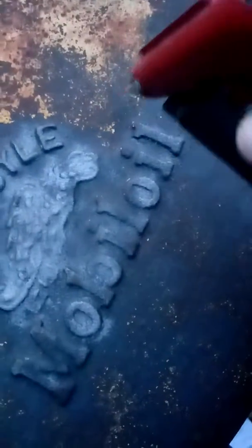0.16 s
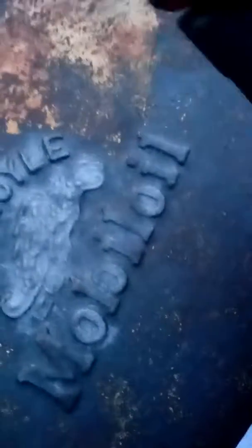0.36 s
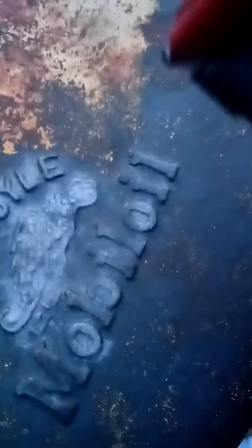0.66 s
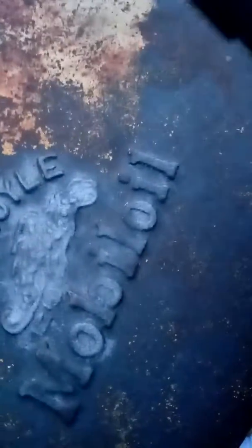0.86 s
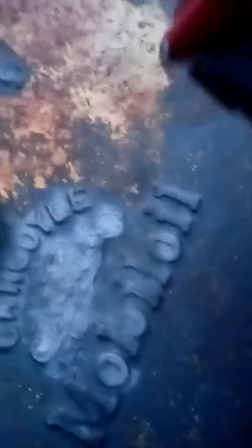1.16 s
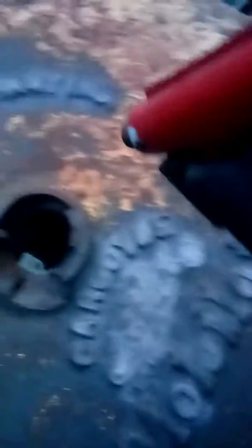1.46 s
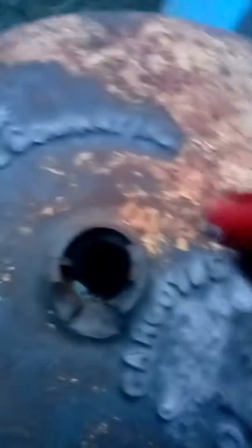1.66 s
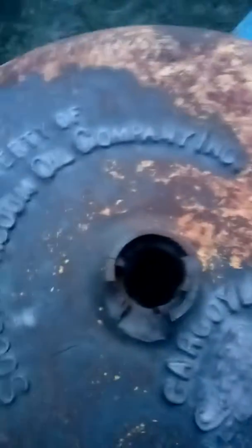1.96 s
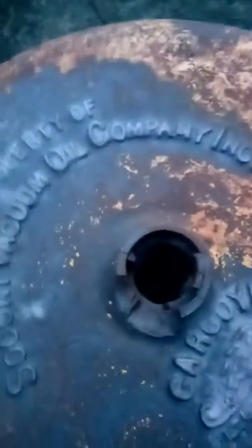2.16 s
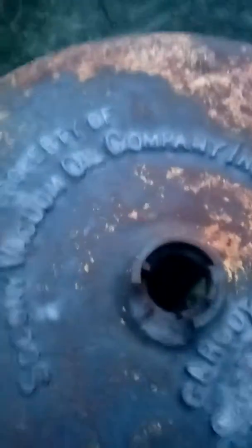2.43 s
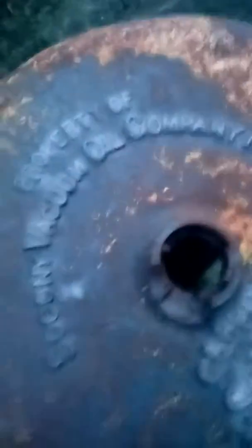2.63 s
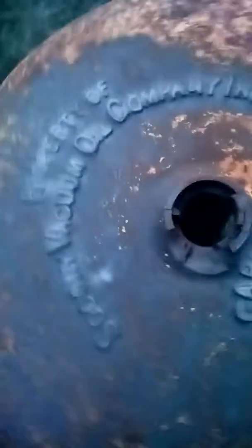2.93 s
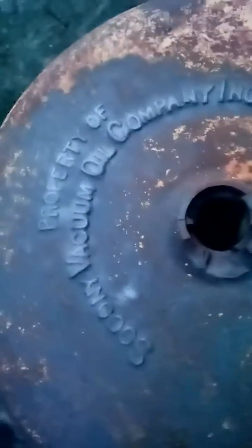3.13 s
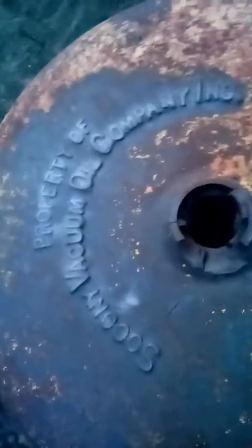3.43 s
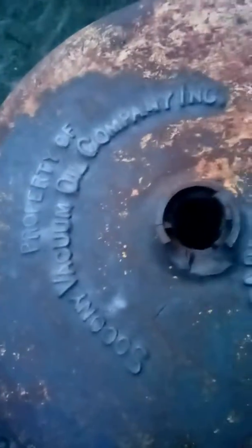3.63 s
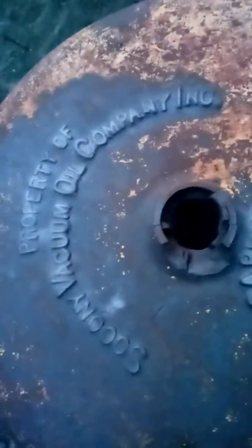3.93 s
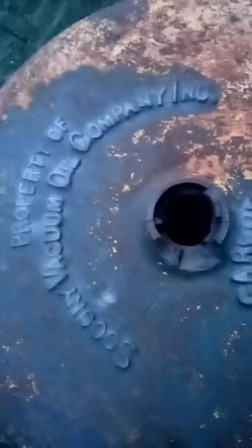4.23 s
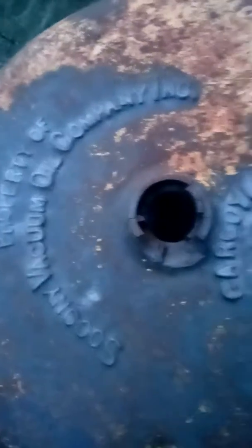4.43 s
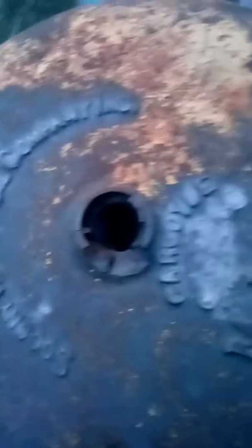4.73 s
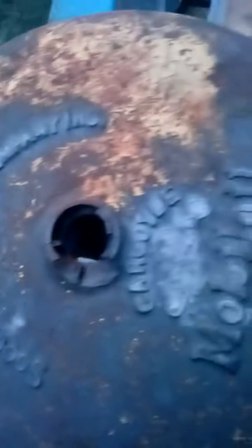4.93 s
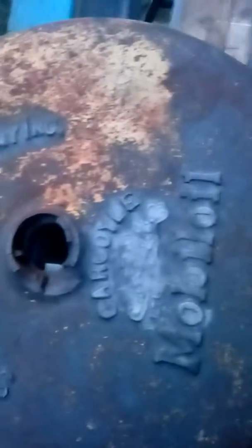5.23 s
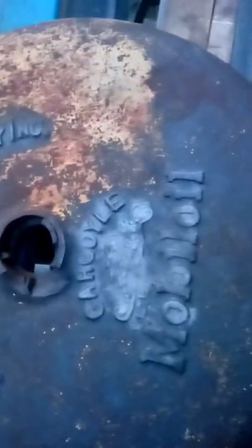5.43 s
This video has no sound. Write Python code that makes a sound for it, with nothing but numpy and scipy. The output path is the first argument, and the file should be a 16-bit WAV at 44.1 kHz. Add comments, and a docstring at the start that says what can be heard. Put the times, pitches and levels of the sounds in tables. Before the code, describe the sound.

At a workshop bench, a loud, slightly whistling jet of air and sand strikes rusty iron, turns briefly hollow and stops abruptly. A thin hiss trails away while a compressor hums low in the background with a faint, breathy tone. Then the heavy iron base slides round on loose sand, quieter than the blast, making a low rumble and many sharp, irregular crunches with a slight metallic ring. The sound is mono.

```python
"""At a blasting bench, a gun's turbulent jet of air and sand hisses against a cast-iron base, booms across its
centre hole and shuts off. Residual air bleeds from the nozzle and fades, and a hollow, breathy tone sets in. A
piston compressor drones behind at multiples of its crank rate; the drone sits lower in level until the jet
shuts off. The base is then dragged round on the spent grit: friction makes a low rumble and a rustle, and the
grit crunches in short, ringing bursts."""
import sys
import numpy as np
from scipy import signal
from scipy.io import wavfile

SR = 44100
rng = np.random.default_rng(int(sys.argv[2]) if len(sys.argv) > 2 else 0)


def output_pcm(signal):
    """Save a mono or channel-first signal as 16-bit PCM at the path in sys.argv[1].

    Samples are clipped to [-1, 1] before scaling.
    """
    pcm = np.clip(np.atleast_2d(signal).T, -1, 1) * 32767
    wavfile.write(sys.argv[1], SR, np.round(pcm).astype(np.int16))


N = 246078

# The jet. Each row: time in seconds, level in dB, centre of the whistling band in Hz, its lift in dB.
JET = [(0, -16.5, 3270, 5.5), (.2, -18, 3520, 2), (.38, -18, 3570, -4.5), (.52, -18.5, 4030, 2),
       (.6, -18.5, 5300, 10), (.72, -17.5, 4750, 1), (.8, -19, 4300, 6.5), (.92, -18, 4640, -1.5),
       (1.15, -18.5, 4150, 4.5), (1.3, -19.5, 4850, 1.5), (1.47, -16.5, 4410, 10), (1.58, -14.5, 4740, 4),
       (1.735, -15.5, 4900, 3.5)]
# Spectrum of the jet. Each row: frequency in Hz, relative level in dB.
JET_SPECTRUM = [(120, -54), (200, -17), (227, -27.5), (507, -22), (718, -9), (786, -14), (1130, -8.5),
                (2530, -7.5), (3510, 0), (5160, -3.5), (6540, -12.5), (9950, -11), (12600, -26.5),
                (15700, -15)]
# The midrange thins as the jet leaves the flat iron. Each row: time in seconds, lift in dB.
JET_MIDRANGE = [(0, 2), (1.2, 0.5), (1.36, -4), (1.56, -11.5), (1.735, -9)]
# Treble of the jet. Each row: time in seconds, lift in dB before weighting by frequency.
JET_TREBLE = [(0, -3), (.5, 1.5), (.9, -7), (1.15, 1.5), (1.3, -3), (1.52, 2.5), (1.735, -11)]
# Resonances of the base. Each row: centre in Hz, width in Hz, lift in dB at full strength.
IRON_MODES = [(2116, 350, 7.5), (2535, 150, 4.5), (2960, 99, 3), (3670, 91, 3), (4420, 300, 1),
              (4780, 1050, 2)]
# Echo off the iron. Each row: time in seconds, mean peak spacing in Hz, full ripple amplitude in dB.
IRON_ECHO = [(0, 2300, 2), (1.0, 2450, 2), (1.73, 2400, 3.5), (2.0, 2720, -0.5), (3.2, 2880, 10.5)]
# Air blown across the centre hole. Each row: time in seconds, level in dB.
HOLE_LEVEL = [(1.25, -70), (1.3, -47), (1.53, -33), (1.58, -32.5), (1.704, -27.5), (1.735, -34)]
# Spectrum of the hole. Each row: frequency in Hz, relative level in dB.
HOLE_SPECTRUM = [(88, -50), (150, -22.5), (563, -4.5), (614, -0.5), (658, -3.5), (1020, -9), (1200, -28),
                 (1560, -38), (2640, -120)]

# The compressor's drone. Each row: time in seconds, overall gain in dB.
COMPRESSOR_GAIN = [(0, -52), (.7, -45), (1.35, -48.5), (1.74, -44.5), (1.8, -34), (3.1, -37), (3.3, -34),
                   (4.85, -38), (5.05, -33), (5.58, -34)]
# Harmonics of the crank. Each row: multiple of the crank rate, relative level in dB.
CRANK_ORDERS = [(5, -26), (6, -24), (7, -3.5), (8, 3), (10, -4), (11, -9), (12, -9), (14, -4), (16, -28),
                (18, -10.5), (20, -16.5), (30, -13.5), (44, -13), (70, -14), (88, -11)]
# Noise of the compressor casing. Each row: frequency in Hz, relative level in dB.
CASING_SPECTRUM = [(18, -51), (30, -18), (81, -5.5), (287, -19), (333, -19.5), (372, -19.5), (491, -16.5),
                   (579, -17.5), (751, -14.5), (1260, -18), (1550, -44), (2040, -20), (2500, -39),
                   (3250, -82), (5500, -120)]
# Steady background hiss. Each row: frequency in Hz, relative level in dB.
ROOM_SPECTRUM = [(2000, -83), (8000, -66), (12000, -84), (15700, -73)]

# Air bleeding from the nozzle. Each row: time in seconds, level in dB.
BLEED_LEVEL = [(1.74, -38), (1.79, -32.5), (1.97, -29.5), (2.12, -34), (2.5, -35.5), (2.85, -41),
               (3.15, -52.5)]
# Spectrum of that air. Each row: frequency in Hz, relative level in dB.
BLEED_SPECTRUM = [(1350, -52), (2300, -12), (2510, -12), (3170, 0.5), (4040, 1.5), (4670, 4.5),
                  (5660, -2.5), (6430, -9.5), (8250, -8), (8950, -11.5), (10300, -10), (12300, -23.5),
                  (13100, -34), (15100, -16), (15700, -11.5)]
# Its rising bright band. Each row: time in seconds, centre in Hz.
BLEED_GLIDE = [(2.0, 5020), (2.36, 6000)]
# Its fading treble. Each row: time in seconds, lift in dB before weighting by frequency.
BLEED_TREBLE = [(1.8, 9.5), (3.1, -4.5)]
# Its hiss above 12 kHz. Each row: time in seconds, lift in dB.
BLEED_TOP = [(1.8, -2), (2.06, 3), (2.5, 6), (3.1, -16)]

# The hollow tone. Each row: time in seconds, level in dB.
HOLLOW_LEVEL = [(1.75, -45), (1.8, -36.5), (2.2, -43), (2.5, -47.5), (2.58, -40.5), (2.85, -33.5),
                (3.27, -48), (3.55, -46), (4.78, -34), (5.05, -40), (5.2, -37), (5.36, -45), (5.46, -39),
                (5.58, -37.5)]
# Its lower resonance. Each row: time in seconds, centre in Hz.
HOLLOW_PITCH = [(3.05, 1530), (3.3, 1416)]
# Its upper resonance. Each row: time in seconds, level in dB relative to the lower.
HOLLOW_UPPER = [(1.8, 1.5), (4.78, -8.5), (5.0, -22)]

# The pull on the base. Each row: time in seconds, rumble level in dB, rustle level in dB.
DRAG_LEVELS = [(2.55, -51, -62), (2.68, -40.5, -43), (3.1, -36, -40), (3.5, -35.5, -39.5),
               (3.8, -33, -34.5), (4.1, -31, -36.5), (4.26, -31.5, -32.5), (4.29, -36, -35.5),
               (4.33, -30, -37.5), (4.45, -30.5, -30), (4.62, -29, -31), (4.88, -30, -36),
               (5.01, -45, -41.5), (5.33, -48, -40.5), (5.37, -37, -40), (5.42, -47, -38), (5.5, -44, -41),
               (5.58, -37, -41)]
# Rumble of the sliding iron. Each row: frequency in Hz, relative level in dB.
RUMBLE_SPECTRUM = [(24, -34), (40, -20), (81, 4), (145, -6), (189, -6.5), (311, -10), (411, -8),
                   (453, -14.5), (573, -7), (767, -4), (1040, -15.5), (1100, -13.5), (1430, -17),
                   (2420, -120)]
# Sand under the iron. Each row: frequency in Hz, relative level in dB.
GRIT_SPECTRUM = [(1000, -36), (1700, -11.5), (2030, -7.5), (2710, -3.5), (4560, 0.5), (6020, -13),
                 (8500, -19.5), (9410, -26.5), (10100, -23.5), (11300, -31.5), (12400, -55), (15700, -48)]
# Crunches. Each row: start in seconds, level in dB, ringing frequency in Hz, then treble and
# loose sand, both in dB relative to that level.
CRUNCHES = [(2.7516, -25.5, 4820, -25, -27), (2.9501, -15.5, 3480, -19.5, -24),
            (3.0704, -28.5, 4500, -25, -10), (3.0844, -26, 2500, -25, -14), (3.1337, -19, 4340, -36, -30),
            (3.18, -18, 2500, -28, -18), (3.1934, -19.5, 4430, -22, -25), (3.2216, -21, 2170, -28, -15),
            (3.3528, -16.5, 4450, -30, -16), (3.3944, -30, 2140, -20, -10), (3.5124, -27.5, 4480, -27, -9),
            (3.527, -24, 4490, -30, -10), (3.553, -18.5, 4870, -30, -22), (3.5616, -20, 3550, -21, -19),
            (3.722, -22, 4470, -25, -23), (3.7424, -29, 3600, -25, -18), (3.7884, -20, 4950, -22, -31),
            (3.8274, -12.5, 4370, -29, -15), (3.845, -33, 4970, -23, -31), (3.8716, -26, 4410, -16, -26),
            (3.914, -21.5, 5000, -23, -7), (3.971, -17.5, 4130, -20, -10), (4.0326, -17.5, 2020, -30, -14),
            (4.0528, -15.5, 4380, -27, -16), (4.0904, -18.5, 4420, -29, -10.5),
            (4.1545, -19, 4800, -29, -14), (4.2047, -19, 4300, -28, -11), (4.2234, -25, 3730, -23, -14),
            (4.242, -19, 4440, -23, -15), (4.305, -17.5, 3670, -28, -6), (4.3295, -19, 4800, -30, -22),
            (4.375, -18, 4430, -33, -20), (4.4163, -21, 4400, -29, -14), (4.4475, -21, 4030, -30, -19),
            (4.4657, -25, 3190, -30, -14), (4.5116, -23, 4020, -32, -23), (4.6265, -20, 4040, -32, -24),
            (4.7261, -22, 2480, -29, -24), (4.8219, -27, 4300, -16, -22), (5.155, -27.5, 3810, -39, -5),
            (5.3562, -31, 4770, -23, -4), (5.391, -27.5, 4330, -11, -17), (5.44, -19, 3880, -41, -13.5),
            (5.5238, -23.5, 4310, -35, -9), (5.5414, -19, 4120, -37, -16)]

WINDOW, HOP = 512, 128   # samples per short spectrum and between frames


def from_db(db):
    """Amplitude grows tenfold for every 20 dB."""
    return 10 ** (np.asarray(db) / 20)


def unit_rms(x):
    """Division by the rms gives a signal unit power."""
    return x / np.sqrt(np.mean(x ** 2) + 1e-20)


def column(rows, k, s):
    """Linear interpolation gives column k of a table at times s."""
    return np.interp(s, np.array(rows)[:, 0], np.array(rows)[:, k])


def envelopes(rows, fade_s=0.003):
    """A gate spans the first row to the last; the interpolated columns follow it."""
    s, *columns = np.transpose(rows)
    t = np.arange(N) / SR
    gate = np.clip((t - s[0]) / fade_s + 1, 0, 1) * np.clip((s[-1] - t) / fade_s + 1, 0, 1)
    return [gate] + [np.interp(t, s, c) for c in columns]


def spectrum_db(points, hz):
    """A spectrum is interpolated on a logarithmic frequency axis."""
    return np.interp(np.log(hz), np.log(np.array(points)[:, 0]), np.array(points)[:, 1])


def bell(hz, centre_hz, width_hz):
    """A resonance curve of height 1 falls to half at the edges of its width."""
    return 1 / (1 + (2 * (hz - centre_hz) / width_hz) ** 2)


def treble_share(hz):
    """A spectral tilt grows by the octave above 5 kHz."""
    return np.clip(np.log2(hz / 5000) / 2.3, 0, 1)


def drift(rate, rows=1):
    """Low-passed noise, one value a frame, wanders about rate times a second."""
    pole = np.exp(-np.pi * rate * WINDOW / SR / 2)
    noise = rng.standard_normal((rows, N // HOP + 403))
    return unit_rms(signal.lfilter([1], [1, -2 * pole, pole * pole], noise)[:, 400:])


def grains(spread_db):
    """Dense impacts merge into noise, rougher the more their sizes differ."""
    return rng.standard_normal(N) * from_db(spread_db * np.minimum(rng.exponential(1, N), 5))


def coloured(source, colour, band_db, swell_db, rate, size=WINDOW):
    """A time-varying filter applies colour(Hz, s) in dB; bands flicker singly and swell together."""
    hz, s, spectra = signal.stft(source, SR, nperseg=size, noverlap=size * 3 // 4)
    hz = np.maximum(hz, 10)[:, None]
    band = np.round(np.interp(hz[:, 0], [0, 1000, SR / 2], [0, 10, 110])).astype(int)
    frame = (np.minimum(s * SR, N) / HOP).astype(int)
    flicker_db = band_db * drift(rate, rows=111)[band] + swell_db * drift(rate)
    spectra = spectra * from_db(colour(hz, s) + flicker_db[:, frame])
    return unit_rms(signal.istft(spectra, SR, nperseg=size, noverlap=size * 3 // 4)[1][:N])


def iron_db(hz):
    """Struck iron responds most strongly near its natural frequencies."""
    return sum(db * bell(hz, centre_hz, width_hz) for centre_hz, width_hz, db in IRON_MODES)


def echo_db(hz, s):
    """Direct sound and echo interfere in a comb of peaks that slides as the nozzle moves."""
    hand = drift(rate=4.3)[0]
    unsteadiness = np.interp(s * SR / HOP, np.arange(len(hand)), hand)
    spacing_hz = column(IRON_ECHO, 1, s) * (1 + 0.059 * unsteadiness)
    return column(IRON_ECHO, 2, s) * np.cos(2 * np.pi * hz / spacing_hz) * np.clip(hz / 3500 - .5, 0, 1)


def jet():
    """Turbulence radiates broadband hiss with a whistling band; the hole resonates when blown across."""
    def colour(hz, s):
        whistle = column(JET, 3, s) * bell(hz, column(JET, 2, s), 340)
        midrange = column(JET_MIDRANGE, 1, s) * bell(hz, 2830, 2040)
        treble = column(JET_TREBLE, 1, s) * treble_share(hz) * bell(hz, 13000, 9700)
        steady = spectrum_db(JET_SPECTRUM, hz) + 0.34 * iron_db(hz)
        return steady + whistle + midrange + treble + echo_db(hz, s)
    gate, level_db, *_ = envelopes(JET)
    _, boom_db = envelopes(HOLE_LEVEL)
    hiss = coloured(grains(1.0), colour, band_db=2.0, swell_db=0.73, rate=5.5)
    boom = coloured(grains(0.46), lambda hz, s: spectrum_db(HOLE_SPECTRUM, hz),
                    band_db=-3.3, swell_db=1.0, rate=16.0, size=2048)
    return gate * (from_db(level_db) * hiss + from_db(boom_db) * boom)


def compressor(crank_hz=10.9, throb_peak_s=1.81):
    """Periodic piston motion gives harmonics of the crank rate and modulates the casing noise."""
    def waver(rate):
        return np.interp(np.arange(N) / HOP, np.arange(3 + N // HOP), drift(rate)[0])
    _, gain_db = envelopes(COMPRESSOR_GAIN)
    angle = 2 * np.pi * np.cumsum(crank_hz * (1 + 0.0031 * waver(2.54))) / SR
    harmonics = sum(from_db(db + 2.0 * waver(2.1)) * np.sin(order * angle + rng.uniform(0, 2 * np.pi))
                    for order, db in CRANK_ORDERS)
    casing = coloured(grains(0.84), lambda hz, s: spectrum_db(CASING_SPECTRUM, hz),
                      band_db=2.5, swell_db=1.0, rate=3.4, size=4096)
    throb_db = -2.5 + 2 * np.cos((angle - angle[int(throb_peak_s * SR)]) / 2)   # once in two turns
    casing_db = -3.0 + 0.75 * np.sin(2 * angle)   # twice a turn
    return from_db(gain_db) * (from_db(throb_db) * unit_rms(harmonics) + from_db(casing_db) * casing)


def room_hiss():
    """Faint, high filtered noise forms the noise floor."""
    return from_db(-62) * coloured(grains(.2), lambda hz, s: spectrum_db(ROOM_SPECTRUM, hz),
                                   band_db=1.5, swell_db=.6, rate=5.0)


def bleed():
    """Residual pressure drives a thin hiss whose bright band glides up as the treble dies away."""
    def colour(hz, s):
        glide = 5.3 * bell(hz, column(BLEED_GLIDE, 1, s), 660)
        treble = column(BLEED_TREBLE, 1, s) * treble_share(hz)
        top = column(BLEED_TOP, 1, s) * np.clip((hz - 12000) / 1500, 0, 1)
        return spectrum_db(BLEED_SPECTRUM, hz) + glide + treble + top + echo_db(hz, s)
    gate, level_db = envelopes(BLEED_LEVEL, fade_s=.06)
    return gate * from_db(level_db) * coloured(grains(.3), colour, band_db=1.5, swell_db=0.4, rate=5.0)


def hollow_tone():
    """Two narrow resonances give noise a breathy pitch; the lower one slides down."""
    def colour(hz, s):
        lower = bell(hz, column(HOLLOW_PITCH, 1, s), 210)
        upper = from_db(column(HOLLOW_UPPER, 1, s)) * bell(hz, 1880, 200)
        return 20 * np.log10(lower + upper)
    gate, level_db = envelopes(HOLLOW_LEVEL, fade_s=0.034)
    breath = coloured(grains(0.62), colour, band_db=2.15, swell_db=-1.5, rate=2.6, size=2048)
    return gate * from_db(level_db) * breath


def grit_db(hz, s):
    """The resonances of the base filter the noise of the sand beneath it."""
    return spectrum_db(GRIT_SPECTRUM, hz) + iron_db(hz)


def bursts(rise_s, t60_s):
    """Each crunch excites an exponential decay, given as (first sample, envelope)."""
    t = np.arange(SR // 4) / SR
    shape = from_db(-60 * t / t60_s) * np.clip(t / rise_s, 0, 1)
    return [(round(s * SR), from_db(db) * shape[:N - round(s * SR)]) for s, db, *_ in CRUNCHES]


def superpose(pieces):
    """Overlapping pieces add linearly, each from its first sample."""
    out = np.zeros(N)
    for start, piece in pieces:
        out[start:start + len(piece)] += piece
    return out


def drag():
    """Sliding friction of iron on sand makes a rumble and a rustle, both swelling after each crunch."""
    gate, rumble_db, rustle_db = envelopes(DRAG_LEVELS, fade_s=0.081)
    rumble = coloured(grains(1.5), lambda hz, s: spectrum_db(RUMBLE_SPECTRUM, hz),
                      band_db=1.5, swell_db=1.2, rate=14.0, size=1024)
    rustle = coloured(grains(0.88), lambda hz, s: grit_db(hz, s) + 1.6 * bell(hz, 4120, 630),
                      band_db=2.5, swell_db=0.97, rate=39.0)
    thuds = from_db(-19) * superpose(bursts(rise_s=0.035, t60_s=0.17))
    spills = bursts(rise_s=0.019, t60_s=0.15)
    loose_sand = superpose((start, from_db(sand_db) * shape)
                           for (start, shape), (*_, sand_db) in zip(spills, CRUNCHES))
    return (gate * from_db(rumble_db) + thuds) * rumble + (gate * from_db(rustle_db) + loose_sand) * rustle


def crunches(ring_width_hz=170):
    """Each crunch is a fast-decaying transient of grit noise with one resonance ringing out of it."""
    shapes = bursts(rise_s=.003, t60_s=0.038)
    pole = np.exp(-np.pi * ring_width_hz / SR)
    rings, treble_shapes = [], []
    for (start, shape), (_, _, ring_hz, treble_db, _) in zip(shapes, CRUNCHES):
        resonator = [1, -2 * pole * np.cos(2 * np.pi * ring_hz / SR), pole * pole]
        tone = signal.lfilter([1], resonator, rng.standard_normal(SR // 4))
        rings.append((start, unit_rms(tone)[:len(shape)] * shape))
        treble_shapes.append((start, from_db(treble_db) * shape))
    grit = coloured(grains(1.7), grit_db, band_db=3.0, swell_db=.8, rate=40.0)
    fine_grit = coloured(grains(2.0), lambda hz, s: 40 * np.log10(bell(hz, 8500, 5000)),
                         band_db=3.0, swell_db=1.5, rate=25.0)
    body = from_db(-5.5) * (superpose(rings) + superpose(shapes) * grit)
    lowpass = signal.butter(12, 10800, fs=SR, output="sos")
    return signal.sosfilt(lowpass, body + superpose(treble_shapes) * fine_grit)


def scene():
    """The sound pressures superpose at one microphone, which feeds both channels."""
    pressure = jet() + bleed() + hollow_tone() + compressor() + drag() + crunches() + room_hiss()
    return np.tile(pressure, (2, 1))


def record(dry):
    """A steep elliptic low-pass filter limits the bandwidth."""
    cutoff_hz = 15720
    return signal.sosfilt(signal.ellip(14, .3, 70, cutoff_hz, fs=SR, output="sos"), dry)


dry = scene()
out = record(dry)
output_pcm(out)
```